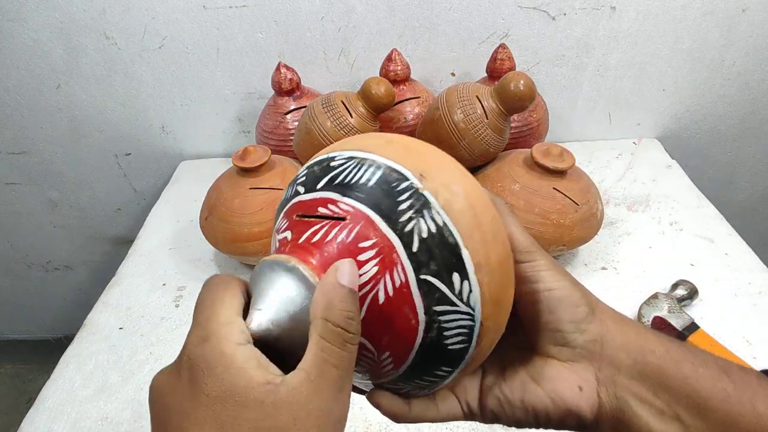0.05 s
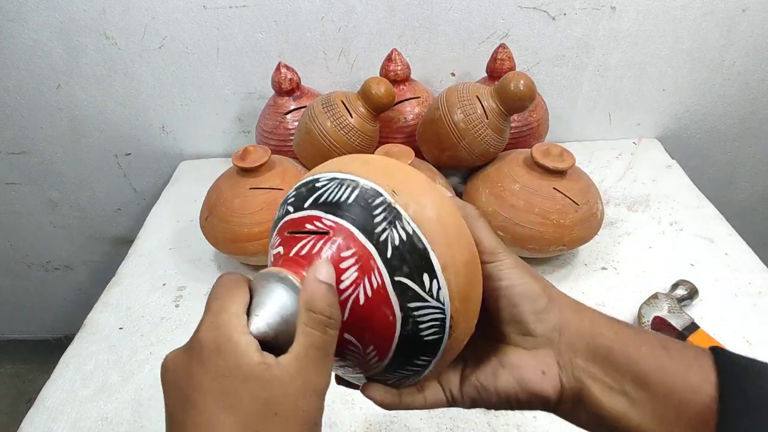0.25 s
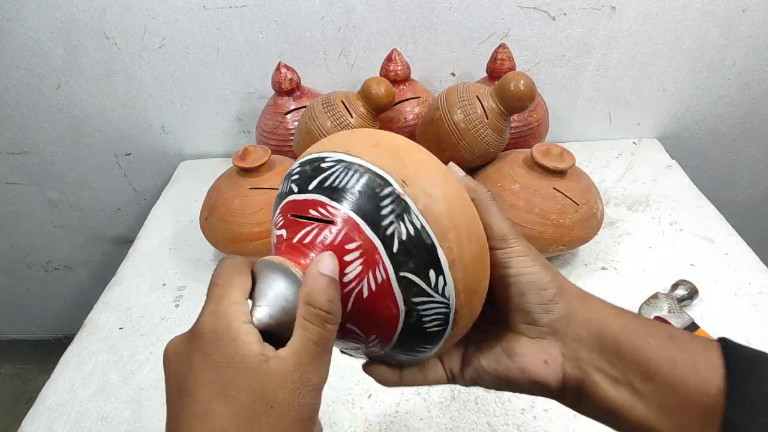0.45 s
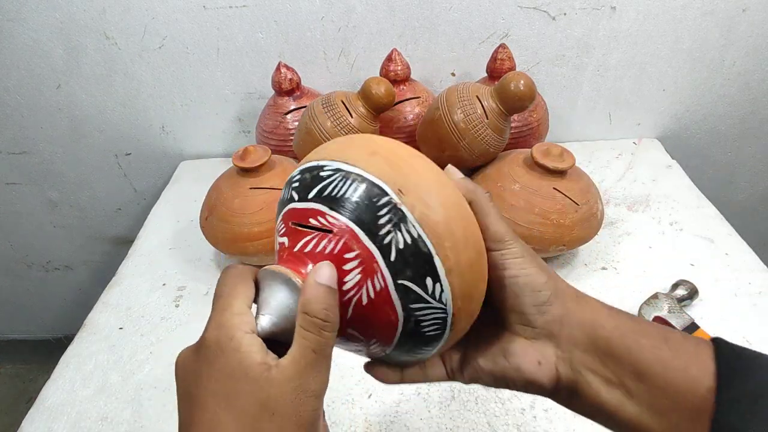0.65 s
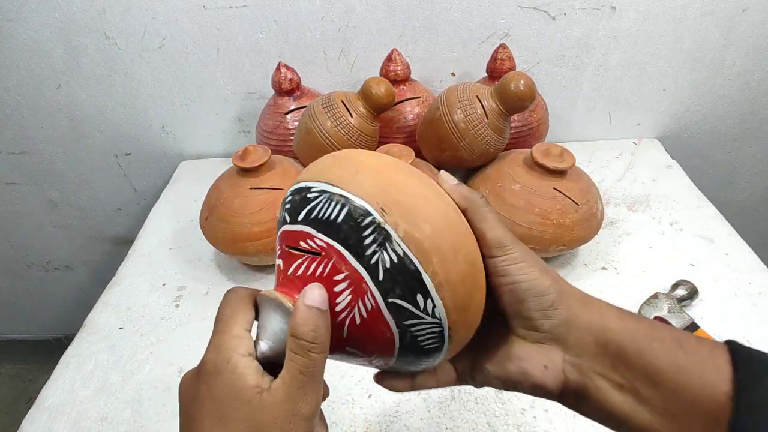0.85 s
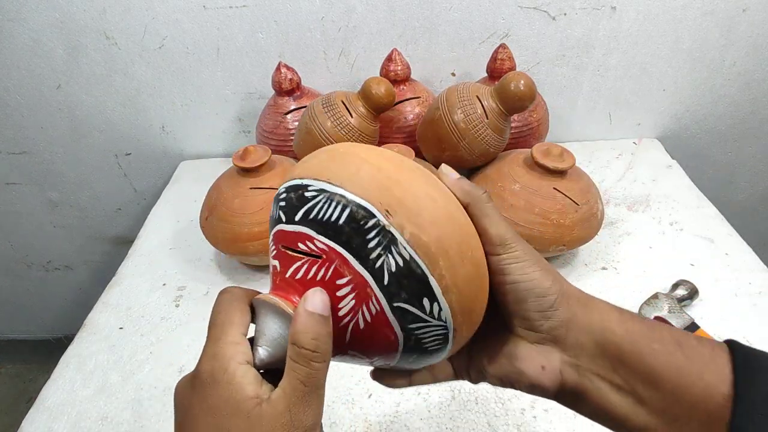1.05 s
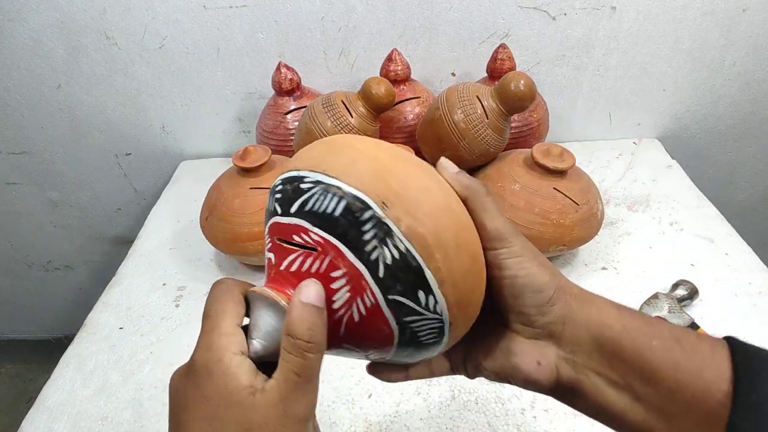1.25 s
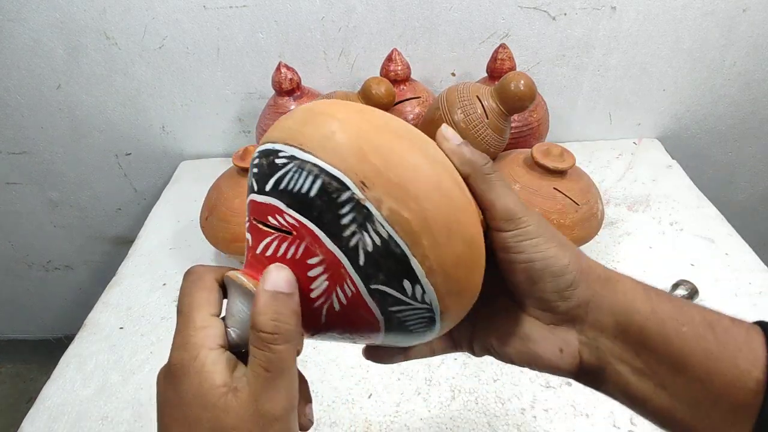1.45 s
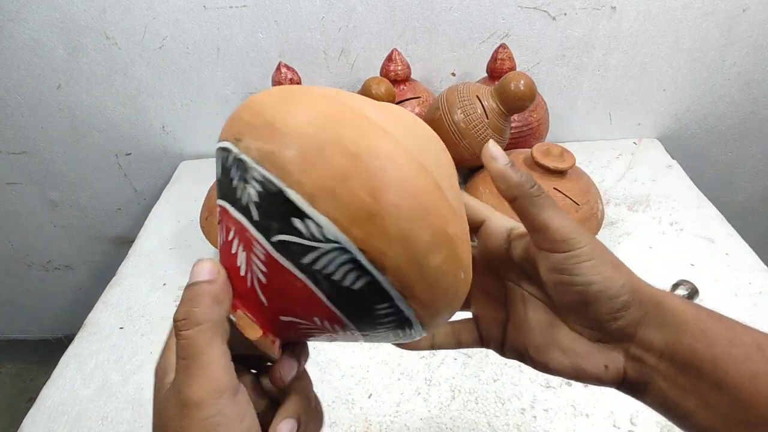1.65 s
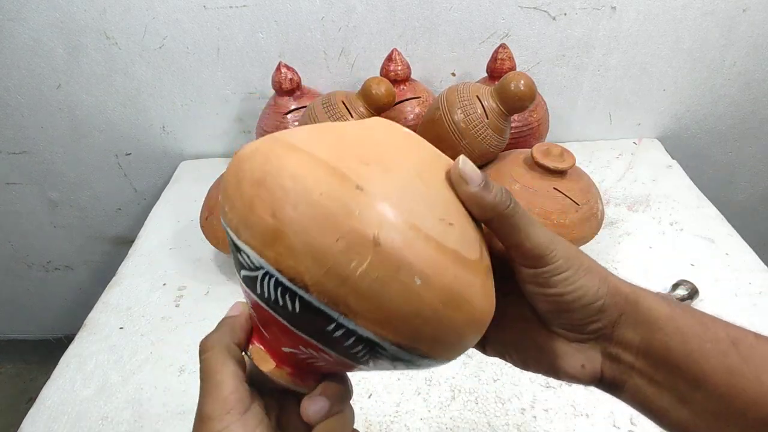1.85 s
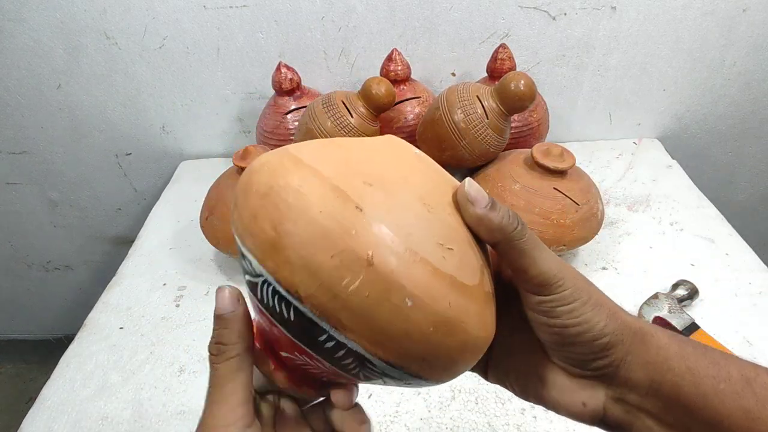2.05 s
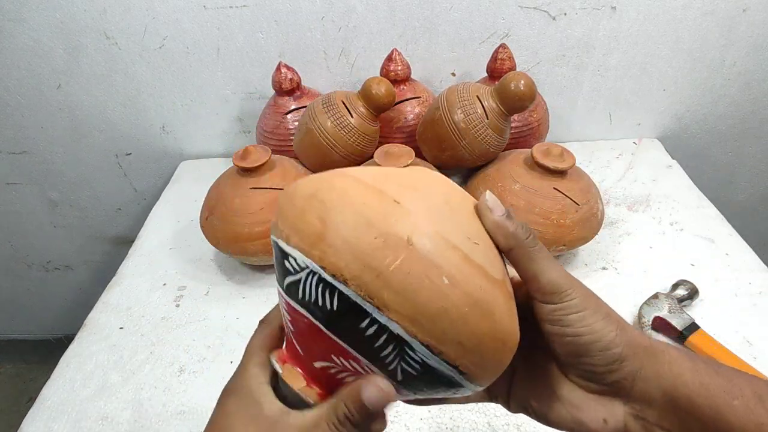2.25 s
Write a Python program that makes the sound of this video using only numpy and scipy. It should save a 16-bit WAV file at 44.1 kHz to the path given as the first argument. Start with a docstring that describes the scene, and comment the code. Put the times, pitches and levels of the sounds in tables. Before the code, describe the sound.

Loose coins slide and clink against the inside of a shaken clay pot in a small room.

```python
"""Coins slide softly, then slap the wall of a clay money pot, shaken by hand above a table.
Each blow rings the coins, clacks the fired clay and thuds in the hollow of the pot.
Single coins tick and the hands knock the pot. Tipped over, it drops the coins towards its neck.
The small, hard-walled room rings on over a faint rumble."""
import sys
import numpy as np
from scipy import signal
from scipy.fft import rfft, irfft
from scipy.io import wavfile

SR = 44100
rng = np.random.default_rng(int(sys.argv[2]) if len(sys.argv) > 2 else 0)


def wrap_up_sound(samples):
    """Save the sound to the file named by the first command line argument, as 16-bit audio."""
    columns = np.atleast_2d(samples).T
    # keep every value between -1 and 1, then stretch to whole-number steps
    tamed = np.clip(columns, -1, 1)
    steps = np.round(tamed * 32767).astype(np.int16)
    wavfile.write(sys.argv[1], SR, steps)


N = 105840

# The sharp crack of coin on coin. Each row: frequency in Hz, strength in dB.
CRACK_SPECTRUM = [(3000, -26.5), (4500, -0.5), (5200, -6), (6200, -1), (8000, 2.5), (10500, 5), (12000, 1),
                  (14500, -5.5)]
RING_SAMPLES, CONTACT_S = 6615, 0.00016  # how long one hit lasts, and how fast it starts
COIN_LIKENESS, CLAY_LIKENESS, THUD_LIKENESS = 0.033, 0.033, 0.8  # left and right: 0 unrelated, 1 the same


def undb(db):
    """Turn decibels into a number to multiply by."""
    return 10 ** (np.asarray(db) / 20)


def fade(t, t60):
    """Die away by 60 dB in t60 seconds."""
    return np.exp(-np.log(1000) * t / t60)


def colour(x, points):
    """Shape the tone with a curve of (Hz, dB) points."""
    hz, db = np.array(points).T
    n = x.shape[-1]
    freqs = np.maximum(np.fft.rfftfreq(2 * n, 1 / SR), 1)
    gain = undb(np.interp(np.log(freqs), np.log(hz), db))
    return irfft(rfft(x, 2 * n) * gain)[..., :n]


def stereo_noise(length, likeness):
    """Noise that is partly the same on the left and the right."""
    common, apart = rng.standard_normal((2, length))
    return np.sqrt(1 + likeness) * common + np.sqrt(1 - likeness) * apart * np.array([[1], [-1]])


def even_level(x):
    """Give a hit an average power of 1 over its first 6 milliseconds."""
    return x / np.sqrt(np.mean(x[:, :264] ** 2))


def burst(spectrum, t60, likeness):
    """Many close, short-lived tones blur into noise that dies away."""
    t = np.arange(RING_SAMPLES) / SR
    noise = colour(stereo_noise(RING_SAMPLES, likeness), spectrum)
    return even_level(noise * fade(t, t60) * (1 - np.exp(-t / CONTACT_S)))


def ring(hz, db, t60, detune=0.0055, scatter_db=6.5):
    """An object struck at a random spot rings with its own tones, in a new mix each time."""
    t = np.arange(RING_SAMPLES) / SR
    tuning, strength = rng.standard_normal((2, len(hz)))
    pitches = hz * (1 + detune * tuning)
    waves = np.exp(2j * np.pi * pitches[:, None] * t) * fade(t, t60[:, None])
    phases = np.exp(2j * np.pi * rng.random((2, len(hz))))  # each microphone gets its own
    weights = undb(db + scatter_db * strength) * phases
    return even_level((weights @ waves).imag * (1 - np.exp(-t / CONTACT_S)))


def brighten(x, db):
    """Raise or lower the treble above 10000 Hz."""
    treble = signal.sosfiltfilt(signal.butter(3, 10000, "high", fs=SR, output="sos"), x)
    return x + (undb(db) - 1) * treble


def add(out, x, start):
    """Mix a sound in at a time in seconds."""
    i = max(int(start * SR), 0)
    out[:, i:i + x.shape[1]] += x[:, :max(N - i, 0)]


def excite(hits, response):
    """Each sample of hits sets off a copy of the response, scaled to a standard energy."""
    response = response / np.sqrt(np.sum(response ** 2) / 2)
    return signal.fftconvolve(np.atleast_2d(hits), response, axes=1)[:, :N]


def coin_clink(loose_coins=3, low_hz=5558, high_hz=13480):
    """Coins collide: the heap rings briefly, the contact cracks and a few loose coins ping."""
    # Tones of coins damped by the heap. Each row: pitch in Hz, relative level in dB, fade in seconds.
    coin_tones = [(6004, -3.5, 0.041), (6560, -9, .035), (7180, -6.5, 0.038), (7845, 4, 0.035),
                  (8085, 0.5, 0.031), (9640, -2.5, 0.058), (10700, -4, 0.059), (10600, 0, 0.033),
                  (12000, -5.5, 0.092), (12230, -16, 0.041), (12700, -38, 0.018), (13300, -9, .04)]
    ping_hz = low_hz * (high_hz / low_hz) ** rng.random(loose_coins)
    pings = ring(ping_hz, db=0, t60=np.full(loose_coins, 0.07))
    heap = ring(*np.array(coin_tones).T)
    crack = burst(CRACK_SPECTRUM, t60=0.056, likeness=COIN_LIKENESS)
    return undb(-10.5) * heap + undb(-10) * crack + undb(-13) * pings


def clay_clack(at_neck):
    """The fired wall clacks and rings; near the neck, free of the heap's weight, it rings more clearly."""
    # Tones of the wall. Each row: pitch in Hz, relative level in dB when struck on the belly,
    # the same when struck near the neck, fade in seconds.
    wall_tones = [(2419, -5, -33, 0.037), (2585.4, -9.5, 4, 0.047), (3389, -11, -11.5, 0.05),
                  (3835, -10, 0.5, 0.055), (4158, 0.5, -4, 0.032), (4586, -11, -6, 0.095),
                  (4950, -21, -2.5, 0.049), (5420, -12.5, 8, 0.025), (5547, -8.5, 0, 0.053)]
    # The noisy part of the clack. Each row: frequency in Hz, strength in dB.
    clack_spectrum = [(900, -34), (1500, -17), (2000, -4.5), (2500, -10), (2750, -4), (3000, -6),
                      (3400, -1.5), (4100, 2.5), (4900, -8), (6500, -11)]
    hz, belly_db, neck_db, t60 = np.array(wall_tones).T
    if at_neck:
        tones = undb(-4.5) * ring(hz, neck_db, t60, detune=0.0026)
    else:
        tones = undb(-5.5) * ring(hz, belly_db, t60)
    clack = burst(clack_spectrum, t60=0.073, likeness=CLAY_LIKENESS)
    return tones + undb(-9 if at_neck else -7.5) * clack


def hollow_thud():
    """The hollow of the pot answers a hit with a short thud."""
    # The tone of the hollow. Each row: frequency in Hz, strength in dB.
    thud_spectrum = [(60, -10), (180, -16), (400, 5), (600, -9), (900, 8), (1300, 2.5), (1900, 1),
                     (2900, -16)]
    return undb(-3.5) * burst(thud_spectrum, t60=0.055, likeness=THUD_LIKENESS)


def sliding_coins(count=20, contacts_per_s=380):
    """Coins slide over each other in a patter of tiny contacts; each also scrapes the wall."""
    # How the slide changes. Each row: time in seconds, then relative dB of the whole, treble and scrape.
    slide = [(0, -52.5, -1, 2), (0.204, -58, 2.5, 5.5), (.24, -26.5, -5, -7), (0.274, -24, -17, 3),
             (.305, -44.5, -15, 11), (.39, -31.5, -4, 7), (.43, -30.5, -8, 1.5), (.48, -25, 6, 2.5),
             (0.536, -35.5, 11.5, 7), (0.559, -40, 11, 11), (0.619, -28, 3, 8.5), (.70, -26, 0, -1.5),
             (.73, -32, -3, 2.5), (.79, -25.5, -4, 9.5), (.825, -30, -3, 1), (0.881, -24, 4, 1),
             (.93, -33, -11, 0.5), (0.998, -30.5, -12, 4.5), (1.05, -40.5, 2, -1), (1.098, -22, -3, -4),
             (1.14, -33, -1, 5), (1.26, -33.5, 5, 8), (1.299, -23.5, 4.5, 5.5), (1.34, -29.5, -1.5, 5.5),
             (1.412, -30, 4.5, 4), (1.47, -30, 1.5, 8), (1.55, -32.5, -7, 3), (1.64, -70.5, -6, 5),
             (1.78, -45, -6, 3), (1.861, -47, 11.5, 2), (1.915, -30.5, 7.5, 3), (2.04, -35, -8, 2.5),
             (2.12, -36.5, -36, 8), (2.23, -41, 1, 5.5), (2.321, -60, 3, -13), (2.4, -42, 1, 3)]
    times, *columns = np.array(slide).T
    db, treble_db, scrape_db = (np.interp(np.arange(N) / SR, times, column) for column in columns)
    coins, wall = np.zeros((2, 2, N))
    for _ in range(count):
        sizes = undb(3 * np.clip(rng.standard_normal(N), -2, 2))
        contacts = (rng.random(N) < contacts_per_s / count / SR) * sizes
        contacts /= np.sqrt(count * np.mean(contacts ** 2))  # each coin gets an equal share
        contacts *= undb(db + 2.5)
        coins += excite(contacts, coin_clink())
        scrape = clay_clack(at_neck=False) + undb(-23.5) * hollow_thud()
        wall += excite(contacts * undb(scrape_db - 10), scrape)
    return brighten(coins, treble_db) + wall


def low_rumble(level_db=-51):
    """A faint low rumble whose level dips and recovers, as if under an automatic volume control."""
    # The tone of the rumble. Each row: frequency in Hz, strength in dB.
    rumble_spectrum = [(20, 7), (38, -2.5), (60, -2.5), (90, -11.5), (200, -12), (400, -16), (1000, -27.5),
                       (3000, -33), (8000, -27), (14000, -42)]
    # A set curve that stands in for that control. Each row: time in seconds, gain in dB.
    gain_curve = [(0, 1), (.2, 1), (.45, -2.5), (.88, -1.5), (1.03, -3), (1.218, -5), (1.35, 4), (1.8, 0.5),
                  (2.4, 4)]
    noise = colour(stereo_noise(N, likeness=0.79), rumble_spectrum)
    gain_db = np.interp(np.arange(N) / SR, *np.array(gain_curve).T)
    return undb(level_db + gain_db) * noise / noise.std()


def room_echo(x, split_hz=6000, delay_s=0.0027, build_s=0.004):
    """Bare walls throw the sound back as a smooth tail, a little shorter in the treble."""
    t = np.arange(SR) / SR
    low, high = (
        signal.sosfilt(signal.butter(2, split_hz, band, fs=SR, output="sos"), rng.standard_normal((2, SR)))
        for band in ("low", "high"))
    tail = low * fade(t, t60=0.79) + high * fade(t, t60=0.65)
    onset = np.clip((t - delay_s) / build_s, 0, 1)
    return undb(-10.5) * excite(x, tail * onset)


def coin_ticks():
    """Single coins tick lightly as they settle."""
    # Settling coins. Each row: start in seconds, level in dB.
    ticks = [(0.025, -52), (0.209, -40.5), (0.223, -38), (1.063, -29), (1.59, -28), (1.671, -37),
             (1.6866, -30.5)]
    out = np.zeros((2, N))
    for start, db in ticks:
        add(out, undb(db) * burst(CRACK_SPECTRUM, t60=0.023, likeness=COIN_LIKENESS), start)
    return out


def hand_knocks():
    """The pot knocks dully in the hands."""
    # The knocks. Each row: start in seconds, level in dB.
    knocks = [(0.21, -46.5), (0.243, -55), (1.296, -43), (1.309, -36.5), (1.405, -44), (1.497, -36),
              (1.757, -52), (1.795, -47), (1.813, -48.5), (2.205, -41), (2.25, -44)]
    # The tone of a knock. Each row: frequency in Hz, strength in dB.
    knock_spectrum = [(50, -23), (180, -0.5), (350, -4.5), (600, -10.5), (1000, -4.5), (2000, -12),
                      (4000, -1), (9000, -38)]
    out = np.zeros((2, N))
    for start, db in knocks:
        add(out, undb(db) * burst(knock_spectrum, t60=0.081, likeness=THUD_LIKENESS), start)
    return out


def heap_blows(neck_from_s=1.75):
    """The heap slaps the wall at each shake: first on the belly, then near the neck once tipped."""
    # The blows. Each row: start in seconds, then relative dB of the whole blow, the coins' treble,
    # the clack, the thud and the coins' lean to the left.
    blows = [(0.2339, -20, -28, -19, -20.5, 7), (0.2481, -11, -30, -34, -28.5, -6),
             (0.2593, -4.5, -12, -22.5, -37, 1), (0.2663, -8, -25, -15.5, -32, -7),
             (0.2764, -11.5, -27, -14, -37, 7), (0.3373, -18, -9, -2, -19, 0.5),
             (0.344, -10.5, -5, -9, -28, 6), (0.3617, -8, 0, -8.5, -34, -7),
             (0.3639, -13, -23, -23, -45, 5), (0.404, -17.5, -4, -14, -22.5, -9),
             (0.4371, -5.5, -9, -29, -38, -3.5), (0.4594, -15, 1, -22, -31, -6),
             (0.4683, -8.5, -4, -16, -29.5, 5), (0.476, -9.5, -6, -13, -34, 0),
             (0.4834, -3.5, -12, -27, -35, -3), (0.4912, -9, -28, -14, -56, 6),
             (0.5305, -26.5, 5, -8, -24, 14), (0.5879, -6.5, -9, -13, -33, -1.5),
             (0.6483, -11, -12, -10.5, -27.5, 0), (0.657, -9, -20, -24, -27.5, -11),
             (0.6644, -8, -15, -24, -39, 7), (0.6694, -7.5, -11, -26, -30, -1),
             (0.6859, -6.5, -19, -16.5, -33, -4), (0.6971, -11, -27, -13, -28.5, 2),
             (0.7058, -12, -20, -13, -35, -9), (0.7952, -16, 2.5, -3, -27, -2),
             (0.8011, -13, -16, -7, -43, 0.0), (0.8107, -5, -16, -15.5, -42, -1),
             (0.828, -3.5, -14, -30, -45, 1.5), (0.8412, -10.5, -29, -24, -33, 5),
             (0.8671, -7, -28, -12, -36, -7), (0.8735, -3, -35, -23, -35.5, -1.5),
             (0.8812, -6.5, -19, -12, -36, 8), (0.8882, -9, -23, -34, -40, -11),
             (0.9748, -3.5, -4, -17, -41.5, 0.5), (1.0734, -5.5, -6.5, -18.5, -33.5, 1.5),
             (1.0836, -4.5, -15, -14.5, -47, 0), (1.0983, -8.5, -8, -12.5, -35, -3),
             (1.1714, -12.5, -2.5, -15, -36, 3), (1.1804, -3.5, -19, -17, -51, -2.0),
             (1.201, -9, -14, -14, -36, 1), (1.2956, -16, -22, -30, -27, 9),
             (1.3086, -3.5, -20, -13, -33.5, -4), (1.3169, -7, -23, -14, -35, 4),
             (1.3591, -3.5, -18, -11.5, -37, -4.5), (1.4206, -14, -3, -5.5, -28, -6),
             (1.4304, -23, 1, -18, -33, 3.0), (1.4875, -12, -5, -9.5, -21, -8),
             (1.4976, -6, -0.5, -13.5, -27, -2), (1.8767, -4, -35, -10.5, -34, -2.5),
             (1.9013, -19, -19, -8, -16, 8), (1.92, -12.5, -11, -4.5, -20, 0),
             (1.9359, -10, -12, 0, -21, 2.5), (1.94, -11, -8, -2, -20.5, -2),
             (1.9637, -9.5, -13, -8, -28, 9.5), (1.9717, -12, -13, -1.5, -26, 5),
             (2.0051, -12, -10, 1, -37, 6), (2.0157, -19, -23, -4.5, -49, -1),
             (2.0554, -26.5, -25, 2.5, -21, -1.5), (2.0898, -8, -27, -10.5, -41, -9),
             (2.3855, -28, -14, -14, -28, -6)]
    out = np.zeros((2, N))
    for start, db, treble_db, clay_db, thud_db, left_db in blows:
        sides = undb(0.99 * left_db * np.array([[.5], [-.5]]))
        coins = brighten(coin_clink(), treble_db + 4.5) * sides
        clack = undb(clay_db) * clay_clack(at_neck=start > neck_from_s)
        thud = undb(thud_db) * hollow_thud()
        add(out, undb(db) * (coins + clack + thud), start)
    return out


def scene():
    """The pot, its echo and the background."""
    pot = heap_blows() + coin_ticks() + hand_knocks() + sliding_coins()
    return pot + room_echo(pot) + low_rumble()


def record(dry, top_hz=14200):
    """Two microphones share each frequency unequally; the highest peaks clip and the top is cut."""
    # Balance of the microphones. Each row: frequency in Hz, left minus right in dB.
    balance = [(200, 1), (600, 6), (850, -1), (1400, 4), (2500, 2.5), (4000, 0), (6500, 0), (7900, -9),
               (9000, -1.5), (10000, 11), (11000, 25), (12100, 8), (14300, 4.5)]
    hz, balance_db = np.array(balance).T
    channels = []
    for channel, side in zip(dry, (-1, 1)):
        share_db = 10 * np.log10(2 / (1 + undb(side * balance_db) ** 2))
        channels.append(colour(channel, np.column_stack([hz, share_db])))
    top_cut = signal.ellip(10, .2, 85, top_hz, fs=SR, output="sos")
    return signal.sosfilt(top_cut, np.clip(channels, -1, 1))


dry = scene()
out = record(dry)
wrap_up_sound(out)
```